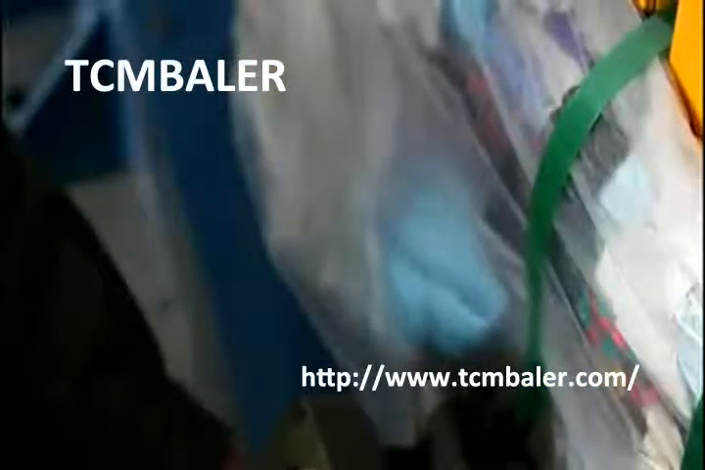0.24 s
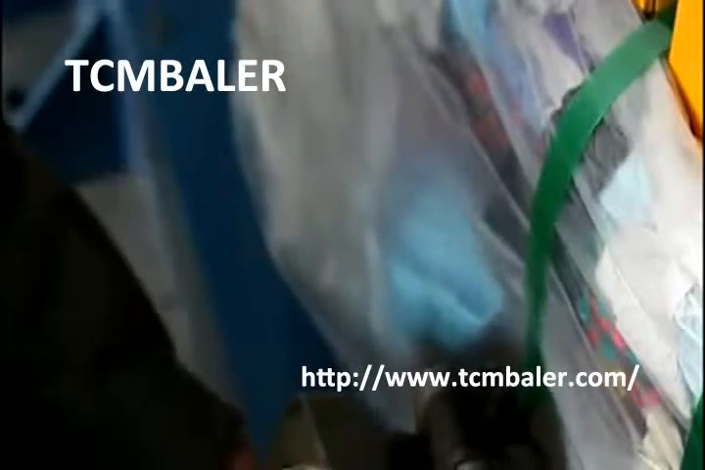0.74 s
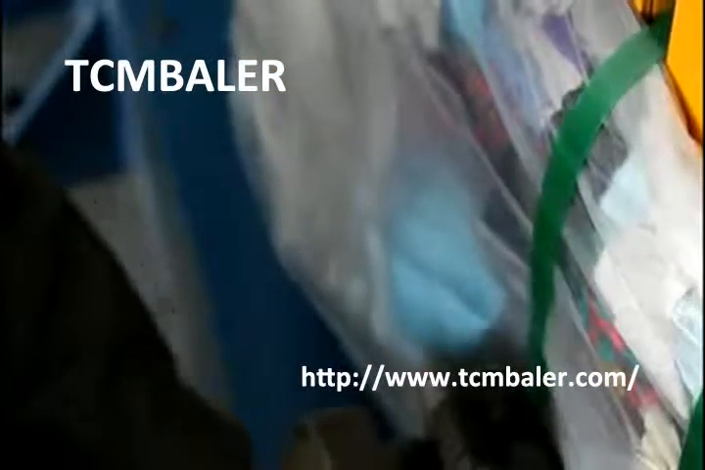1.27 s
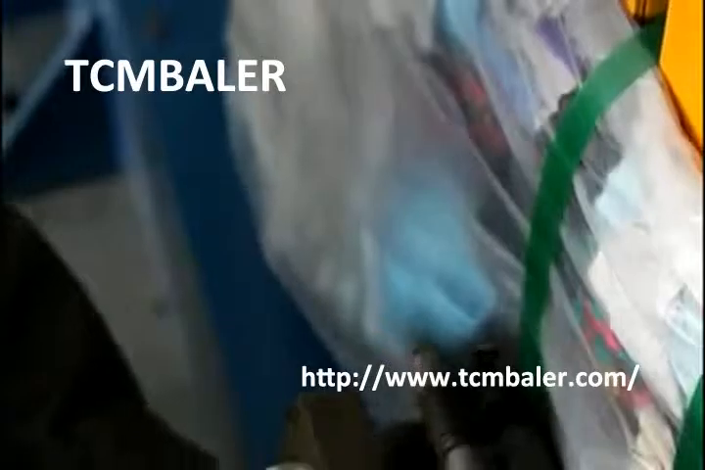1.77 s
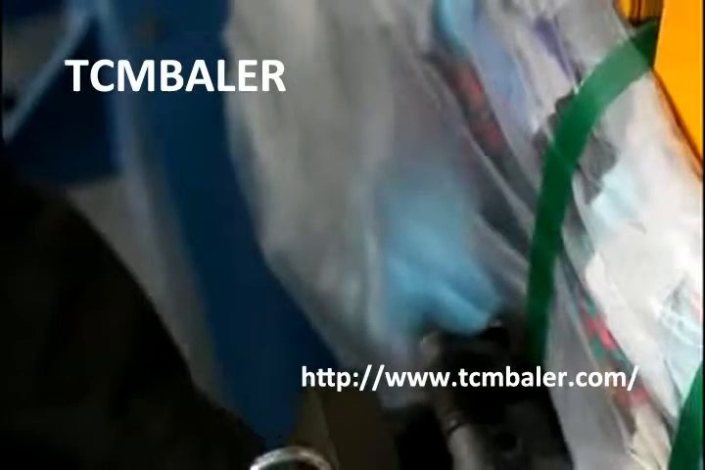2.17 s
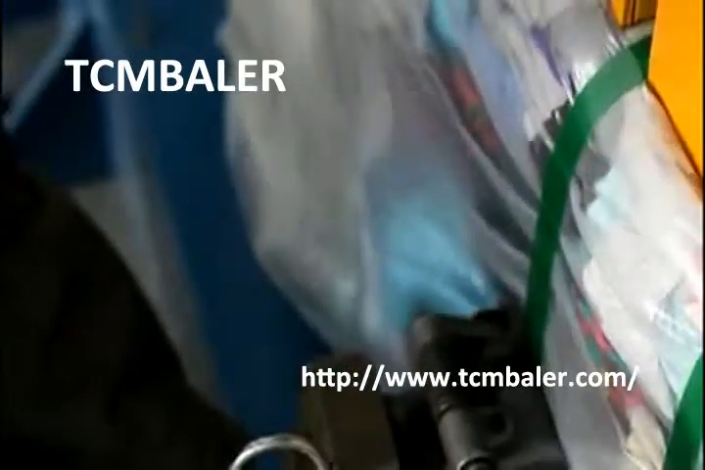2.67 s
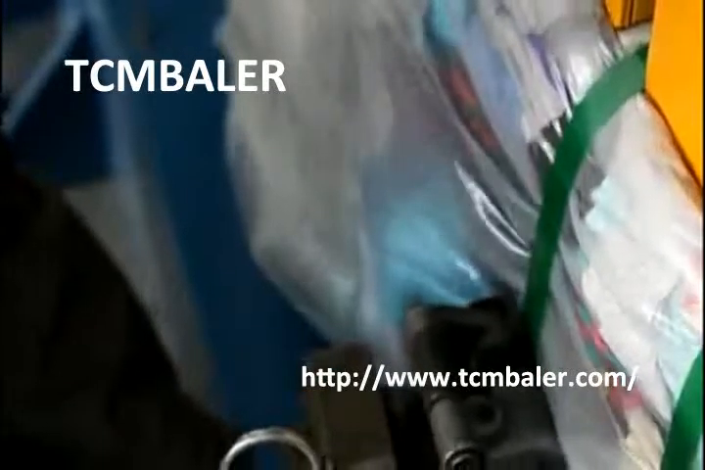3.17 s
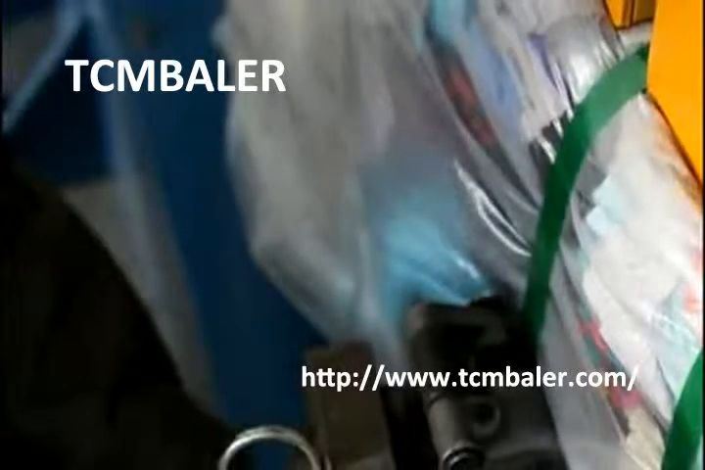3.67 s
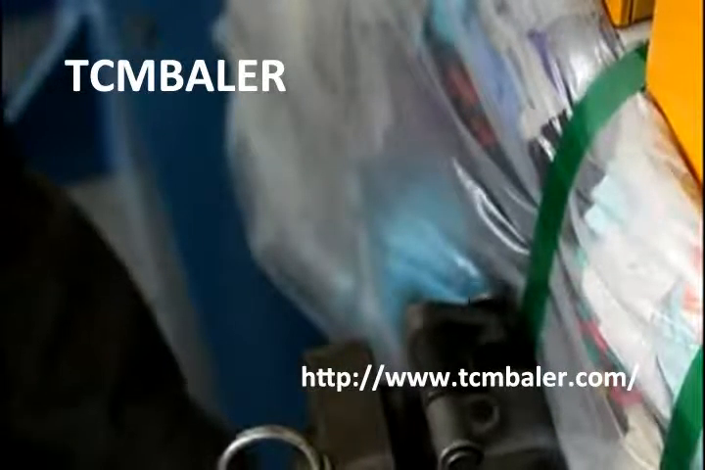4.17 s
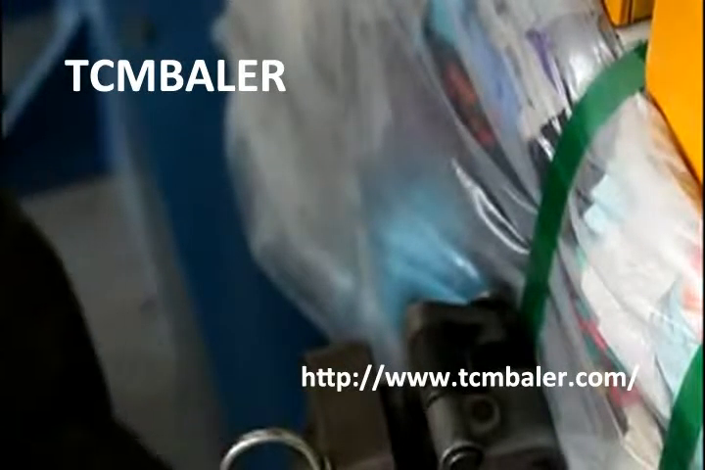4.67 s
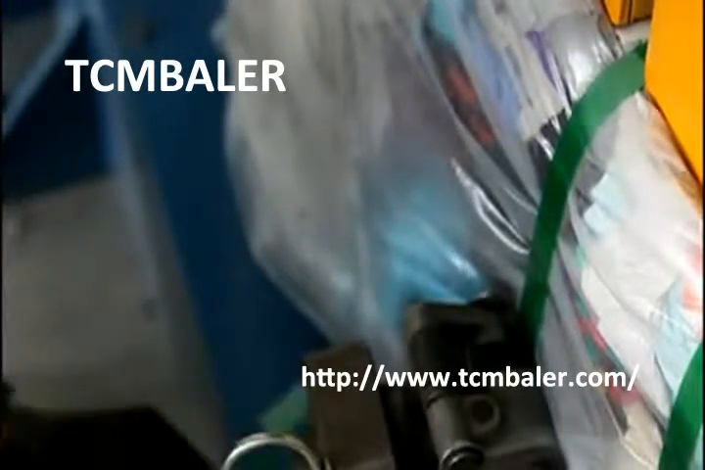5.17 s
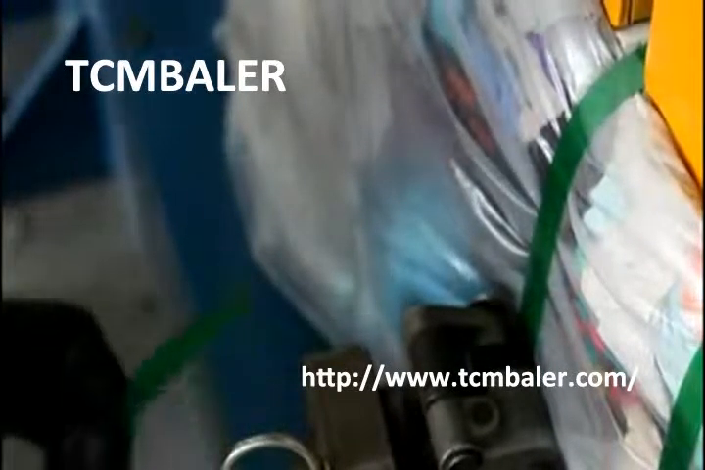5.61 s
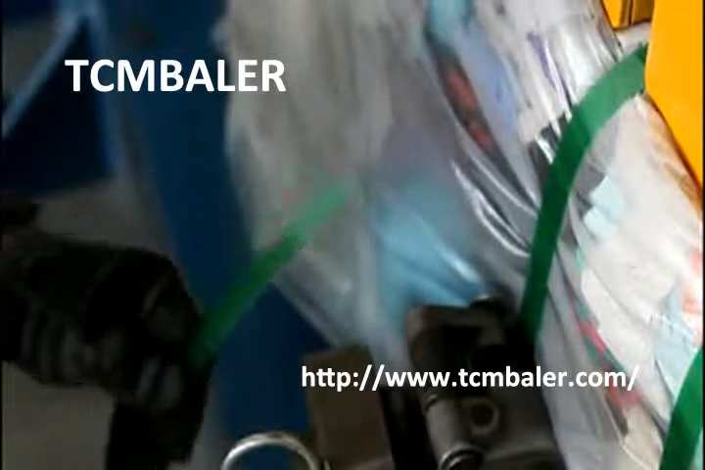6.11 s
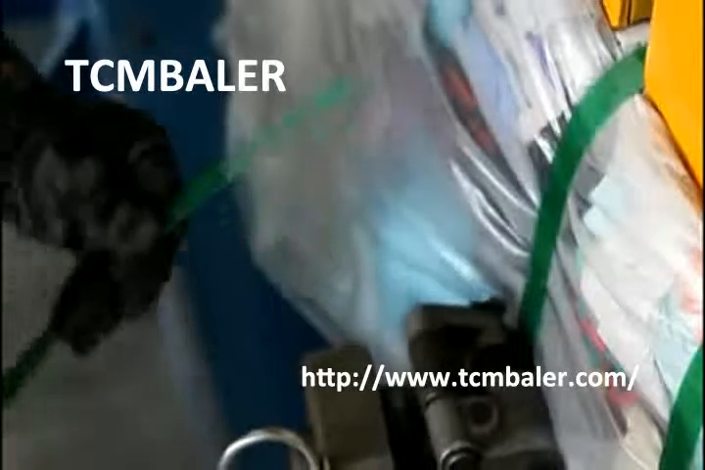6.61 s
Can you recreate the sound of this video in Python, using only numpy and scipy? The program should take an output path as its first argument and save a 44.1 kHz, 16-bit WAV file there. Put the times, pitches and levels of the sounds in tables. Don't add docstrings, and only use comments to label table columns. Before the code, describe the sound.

A handheld air tool hisses and whines, sagging to a stall, then a latch snaps and its welder buzzes steadily in a factory hall.

```python
import sys
import numpy as np
from scipy import signal
from scipy.fft import rfft, irfft
from scipy.io import wavfile
from scipy.ndimage import uniform_filter1d

SR = 44100
rng = np.random.default_rng(int(sys.argv[2]) if len(sys.argv) > 2 else 0)


def level_to_linear(level):
    exponent = np.asarray(level, float) / 20
    return 10 ** exponent


def inscribe(sig):
    pcm = np.round(np.clip(np.atleast_2d(sig).T, -1, 1) * 32767)
    wavfile.write(sys.argv[1], SR, pcm.astype(np.int16))


N = 302085

# start_s, rate_hz
VANE_RATE = [
    (.45, 882),
    (.91, 879.5),
    (1.56, 857),
    (1.7, 859),
    (2.08, 838),
    (2.34, 830),
    (2.6, 827.5),
    (2.98, 815),
    (3.5, 718),
]


def vane_rate():
    t = np.arange(N) / SR
    hz, gate = columns(VANE_RATE)
    spun_s = np.maximum(t - VANE_RATE[0][0], 0)
    hz = hz * (1 - .42 * np.exp(-(spun_s / .04) ** 1.3))
    stall_hz = 4200 * np.clip(t - 3.34, 0, .13) ** 2
    return hz - stall_hz, stall_hz, gate


# multiple, level_db
STRONG_HARMONICS = [(1, -42), (2, -39.5), (4, -42.5), (5, -44.5)]
# multiple, level_db against the first
WEAK_HARMONICS = [(3, -14), (6, -10.5), (7, -6), (8, -13), (9, -10.5)]
# centre_hz, width_hz, gain_db
VANE_PATHS = [(776, 140, 8.5), (1426, 114, -14.5), (1501, 70, 9), (1617, 41, -10), (1685, 74, 5),
              (3080, 220, 5), (3296, 69, 9.5), (3390, 16, 0), (3462, 28, -5.5), (3506, 53, 4),
              (3830, 68, -17), (4204, 110, 9.5), (4309, 49, 9), (4428, 108, 13)]
# centre_hz, width_hz, gain_db
HOUSING_MODES = [(2190, 64, 16.5), (2326, 23, 13), (2580, 150, 4), (4400, 170, 11), (5100, 170, 1),
                 (5170, 64, 9.5), (5473, 160, 7), (6135, 290, 12.5), (7200, 200, -1), (7870, 150, 16.5)]


def vane_whine(hz, stall_hz, turn):
    spun_s = np.maximum(np.arange(N) / SR - VANE_RATE[0][0], 0)
    seating_db = -11 * np.exp(-spun_s / 0.046)
    lines = []
    for k, db in STRONG_HARMONICS:
        lines.append((round(k), db + seating_db + bumps(VANE_PATHS, round(k) * hz)))
    first_db = lines[0][1]
    for k, db in WEAK_HARMONICS:
        load_db = .04 * (hz - 860)
        lines.append((round(k), first_db + db + load_db + bumps(HOUSING_MODES, round(k) * hz)))
    whine = np.zeros(N)
    for (k, db), wobble in zip(lines, drift(32, count=9)):
        stall_db = 0.0524 * (k - 4) * stall_hz
        flutter_db = (1.6 + 0.079 * k) * wobble
        whine += level_to_linear(db + 3.5 - stall_db + flutter_db) * np.sin(k * turn + k * k)
    return whine


# frequency_hz, density_db
JET_TONE = [(1180, -25), (2000, -14.5), (2170, -63), (2590, -10), (2770, -15.5), (3400, -8), (4260, -7.5),
            (4750, -6.5), (5940, 0), (6720, 2.5), (7810, 0.5), (9570, -14.5), (10200, -24), (13200, -55),
            (22000, -120)]
# centre_hz, width_hz, gain_db
NOZZLE_MODES = [(5970, 150, 3), (6470, 110, 4.5), (6260, 110, 0.5), (7030, 150, 3), (7500, 220, 4)]


def exhaust_jet(hz, turn):
    t = np.arange(N) / SR
    opens_s, rise_s = 0.401, 0.026
    opened_s = np.maximum(t - opens_s - rise_s, 0)
    surge_db = 4.5 * np.exp(-opened_s / 0.15)
    load_db = .003 * np.minimum(hz - 830, 0) * (t > 1)
    puffs = 1 + 0.11 * np.cos(turn)
    air = noise(JET_TONE, patchy_db=1.2, flicker_db=1.0, peaks=NOZZLE_MODES)
    return level_to_linear(-26.5 + surge_db + load_db - 0.5) * puffs * air


# frequency_hz, density_db
GEARS_TONE = [(400, -19), (700, 2), (1300, -0.5), (2200, 4.5), (3000, 8.5), (4500, 12), (6000, -13.5)]


def gear_noise():
    t = np.arange(N) / SR
    mesh_db = 11.5 * np.exp(-((t - 0.483) / 0.024) ** 2)
    gears_db = -49.5 + 0.42 * (columns(CAMERA_GAIN)[0] + 50) + mesh_db
    return level_to_linear(gears_db + 11.0) * noise(GEARS_TONE, patchy_db=3.0, flicker_db=-2.0)


def tensioner():
    t = np.arange(N) / SR
    hz, stall_hz, gate = vane_rate()
    turn = 2 * np.pi * np.cumsum(hz * (1 + 0.00287 * drift(33.4, count=1)[0])) / SR
    gate = gate * np.clip(np.minimum(t - .45, 3.458 - t) / .025, 0, 1)
    opening = (t - 0.401) / 0.026
    shutting = 1 - (t - 3.432) / 0.049
    valve = np.clip(np.minimum(opening, shutting), 0, 1) ** 2
    return gate * vane_whine(hz, stall_hz, turn) + valve * (exhaust_jet(hz, turn) + gear_noise())


# frequency_hz, gain_db
HEAD_TONE = [(300, 2.5), (3800, 1.5), (4900, 3), (5400, 1), (6300, -2.5), (6900, -1.5), (7700, -1.5)]
# centre_hz, width_hz, gain_db
HEAD_MODES = [(627, 30, 4), (1280, 50, -6), (1420, 50, 7), (1630, 40, -4), (1705, 60, 3), (1870, 70, 5),
              (2080, 90, -5), (2180, 90, -10), (2665, 120, 8), (2885, 50, 6), (2990, 70, -6), (3135, 50, 3),
              (3260, 50, -8), (3400, 70, 4), (3640, 50, -5), (3740, 60, 5), (4010, 60, 3), (4260, 60, -8),
              (4630, 70, 2.5), (4870, 90, 6), (5130, 60, -5), (5420, 90, -4)]
# multiple, level_db
STROKE_SHAPE = [(3, -14), (4, -21), (5, -6.5), (6, -23), (7, -2.5), (8, -16), (9, 0), (10, -2), (11, -2.5),
                (12, -6), (13, 3), (14, -2), (15, 2), (16, -3), (17, 3), (18, -0.5), (19, 1), (20, -3.5),
                (21, 4), (22, -14), (23, 1), (24, -1.5), (25, 0.5), (26, 3), (27, -1), (28, 2.5), (29, -2),
                (30, -15), (31, -0.5)]


def stroke_buzz(hz, turn, gate):
    on = np.flatnonzero(gate)
    knots = on[::128]
    k = np.arange(3, 62)[:, None]
    at_hz = k * hz[knots]
    wobble = rng.standard_normal(at_hz.shape[::-1])
    wobble = evened(uniform_filter1d(wobble, size=48, axis=0, mode="wrap").T)
    hard = np.clip((5.2 - knots / SR) / 0.48, 0, 1)
    blur_db = (0.086 * np.maximum(k - 22, 0) + 1.0 * np.maximum(10 - k, 0)) * hard
    head_db = read(HEAD_TONE, at_hz) + bumps(HEAD_MODES, at_hz)
    stroke_db = np.interp(k, *np.transpose(STROKE_SHAPE))
    level = level_to_linear(head_db + stroke_db + (2.05 + 0.041 * k) * wobble - blur_db)
    phase = 0.46 * rng.uniform(0, 2 * np.pi, k.shape) - 0.0156 * k * k + np.pi / 2 * (k % 2)
    buzz = np.zeros(N)
    for j, a, p in zip(k, level, phase):
        buzz[on] += np.interp(on, knots, a) * np.sin(j * turn[on] + p)
    return buzz / np.std(buzz[on])


# frequency_hz, density_db
RUB_TONE = [(180, -27), (300, -20), (700, -11.5), (1200, -14.5), (2200, -17), (3000, -8.5), (5000, -5.5),
            (6900, -2), (7700, -5), (8800, -11), (10200, -26.5), (13200, -43)]


def strap_rub(turn):
    since_s = np.arange(N) / SR - 4.31
    rub_db = -31.5 + 6.5 * np.exp(-abs(since_s) / 0.3)
    pressed = np.clip(since_s / 0.0073, 0, 1)
    swell = 1 + 0.3 * np.cos(2 * turn) + 0.062 * np.cos(turn)
    # centre_hz, width_hz, gain_db
    shell = [(1820, 340, 9.0), (2120, 160, -7), (2480, 570, 5.5), (4520, 420, 2.1)]
    return pressed * level_to_linear(rub_db) * swell * noise(RUB_TONE, patchy_db=2.0, flicker_db=0.1, peaks=shell)


# start_s, rate_hz, buzz_db
WELD_STROKES = [
    (4.35, 107, -27),
    (4.45, 102.7, -26.5),
    (4.6, 112.4, -25.5),
    (4.97, 120.5, -26.5),
    (5.23, 127.2, -27),
    (5.64, 131.9, -27),
    (5.74, 131.3, -27),
    (6.0, 125.5, -26),
    (6.85, 125.2, -27.5),
]


def welder():
    t = np.arange(N) / SR
    hz, buzz_db, gate = columns(WELD_STROKES)
    unsteady = .0006 + .03 * np.clip((108 - hz) / 5, 0, 1)
    hz = hz + .7 * np.cos(2 * np.pi * (t - 4.61) / .097) * (t < 5.2)
    turn = 2 * np.pi * np.cumsum(hz * (1 + unsteady * drift(24.25, count=1)[0])) / SR
    return gate * level_to_linear(buzz_db + 0.5) * stroke_buzz(hz, turn, gate) + strap_rub(turn)


# start_s, peak_db, thump_db
CLICKS = [
    (.426, -16, -40),
    (.436, -18, -40),
    (.456, -19, -42),
    (4.3145, -19, -32),
    (4.327, -15, -28),
    (4.334, -4.5, -27),
    (4.3405, -15, -34),
]
# pitch_hz, level_db, t60_s
LATCH_MODES = [(850, -5, .014), (3450, 0, .016), (4800, 0, .014), (5700, -3, .01), (6500, -2, .01)]


def clicks():
    t, out = np.arange(2600) / SR, np.zeros(N)
    cracks = uniform_filter1d(rng.standard_normal((len(CLICKS), len(t))), size=4, axis=1)
    ring = sum(level_to_linear(db - 60 * t / t60) * np.sin(2 * np.pi * hz * t) for hz, db, t60 in LATCH_MODES)
    ring = ring / abs(ring).max()
    thump = np.sin(2 * np.pi * 260 * t) * level_to_linear(-60 * t / 0.019)
    ring_up = 1 - np.exp(-t / .0008)
    for (s, db, thump_db), crack in zip(CLICKS, cracks):
        metal = ring + 0.33 * crack * level_to_linear(-60 * t / 0.038)
        sound = level_to_linear(db) * metal + level_to_linear(thump_db) * thump
        out[round(s * SR):][:len(t)] += sound * 1.8 * ring_up
    return out


# start_s, end_s, level_db over the hall, rise_db_per_s
LEAK_SPELLS = [
    (0, 0.433, 7, 1.5),
    (3.41, 4.323, 0, -0.5),
]
# frequency_hz, density_db
LEAK_TONE = [(290, -53), (500, -5), (739, -10.5), (2300, -7.5), (3360, -2), (5630, -4), (6970, -1.5),
             (9200, -16.5), (10200, -39), (13200, -81), (22000, -120)]
# centre_hz, width_hz, gain_db
OUTLET_MODES = [(3370, 260, 7), (4780, 400, 6.5), (6000, 200, 2), (6880, 330, 5)]


def leak():
    air = noise(LEAK_TONE, patchy_db=1.1, flicker_db=0.1, peaks=OUTLET_MODES)
    envelope = np.zeros(N)
    for start, end, db, rise_db in LEAK_SPELLS:
        level_db, gate = columns([(start, db), (end, db + rise_db * (end - start))])
        envelope += level_to_linear(level_db + 7) * gate
    return envelope * level_to_linear(columns(CAMERA_GAIN)[0]) * air


# frequency_hz, density_db
HALL_TONE = [(15, -57.5), (25, -49), (82, -7), (146, -10.5), (222, -4), (325, -6.5), (374, -4), (466, -8),
             (939, -5), (3000, -12.5), (3900, -45), (6600, -120)]
# start_s, level_db
CAMERA_GAIN = [(0, -38.5), (.425, -39.5), (.48, -57.5), (.95, -64), (1.55, -58.5), (1.6, -53), (2.2, -51.5),
               (2.9, -49), (3.45, -45), (3.88, -43.5), (4.03, -40.5), (4.31, -38), (4.37, -49),
               (4.56, -42.5), (5.5, -47), (6.85, -46)]


def hall():
    level_db, _ = columns(CAMERA_GAIN)
    colour = level_to_linear(read(HALL_TONE, np.fft.rfftfreq(N, 1 / SR)))
    rumble = evened(irfft(rfft(rng.standard_normal(N)) * colour, N))
    return level_to_linear(level_db + 4 + .9 * drift(13, count=1)[0]) * rumble


def evened(x):
    return x / np.sqrt(np.mean(x ** 2) + 1e-20)


def read(points, hz):
    f, value = np.transpose(points)
    return np.interp(np.log(hz + 1), np.log(f + 1), value)


def bumps(peaks, hz):
    return sum(db / (1 + (2 * (hz - f) / w) ** 2) for f, w, db in peaks)


def columns(rows):
    s, *values = np.transpose(rows)
    t = np.arange(N) / SR
    gate = np.clip(np.minimum(t - s[0], s[-1] + .004 - t) / .004, 0, 1)
    return [np.interp(t, s, v) for v in values] + [gate]


def drift(rate_hz, count):
    knots = rng.standard_normal((int(N / SR * 60) + 3, count))
    smooth = signal.filtfilt(*signal.butter(1, np.clip(rate_hz / 30, .01, .95)), knots, axis=0)
    return [np.interp(np.arange(N) * 60 / SR, np.arange(len(k)), evened(k)) for k in smooth.T]


def noise(tone, patchy_db, flicker_db, peaks=()):
    frames, hz = N // 128 + 5, np.fft.rfftfreq(512, 1 / SR)
    a, b, patches = rng.standard_normal((frames, 257, 3)).T
    flicker = evened(uniform_filter1d(rng.standard_normal(frames), size=12))
    patches = uniform_filter1d(patches, size=6, axis=0)
    patches = evened(uniform_filter1d(patches, size=24, axis=1))
    shape_db = read(tone, hz) + bumps(peaks, hz)
    z = (a + 1j * b) * level_to_linear(shape_db[:, None] + patchy_db * patches + flicker_db * flicker)
    return evened(signal.istft(z, nperseg=512, noverlap=384)[1][:N])


def scene():
    start = np.clip((np.arange(N) / SR - .014) / 0.0091, .08, 1)
    return (start * (tensioner() + welder() + clicks() + leak() + hall()))[None]


# frequency_hz, gain_db
TREBLE_TONE = [(7750, -1.5), (9600, 0), (10300, -5), (10800, -21), (11300, -38.5), (11900, -4),
               (12400, -30), (12700, -43)]


def replicate_treble(dry):
    hz, _, z = signal.stft(dry, SR, nperseg=256, noverlap=192)
    power = uniform_filter1d(abs(z) ** 2, size=16, axis=2)
    power = uniform_filter1d(power, size=3, axis=1) + 1e-16
    copy = z[:, 1:-44] * np.sqrt(power[:, 45:] / power[:, 1:-44])
    z[:, 45:] = .75 * copy + .6 * z[:, 45:]
    z[:, 45:] *= level_to_linear(read(TREBLE_TONE, hz[45:]))[:, None]
    return signal.istft(z, SR, nperseg=256, noverlap=192)[1][:, :N]


def roll_off(x):
    return signal.sosfilt(signal.butter(12, 12600, fs=SR, output="sos"), x)


def record(dry):
    mix = replicate_treble(dry)
    return roll_off(mix)


dry = scene()
out = record(dry)
inscribe(out)
```